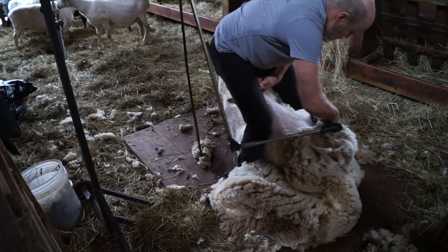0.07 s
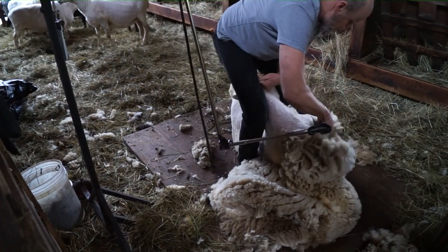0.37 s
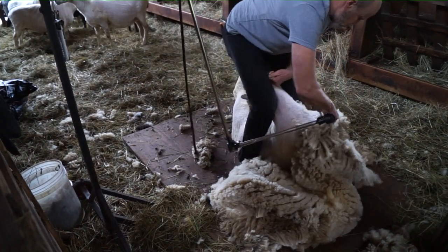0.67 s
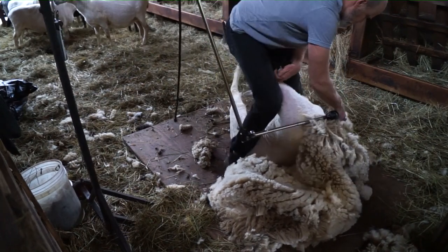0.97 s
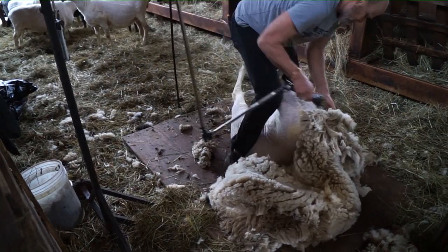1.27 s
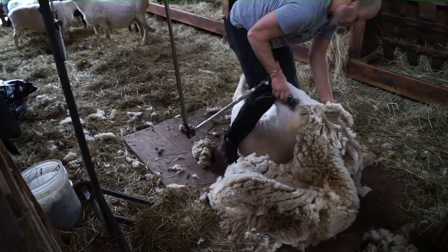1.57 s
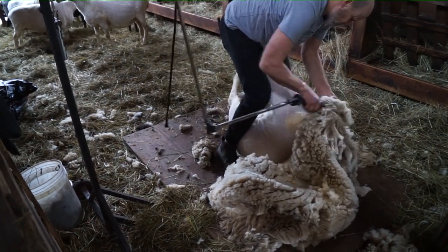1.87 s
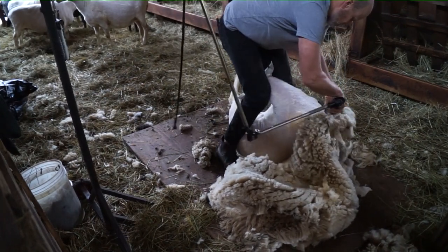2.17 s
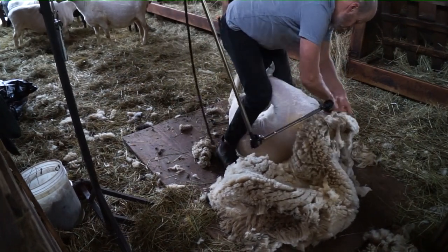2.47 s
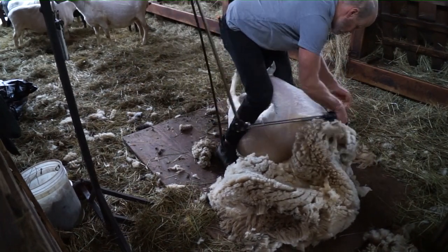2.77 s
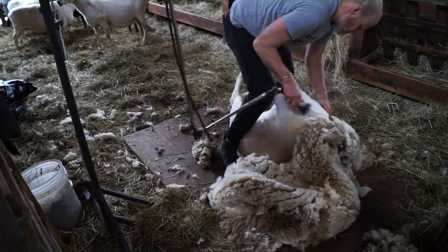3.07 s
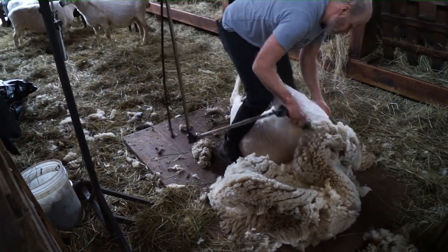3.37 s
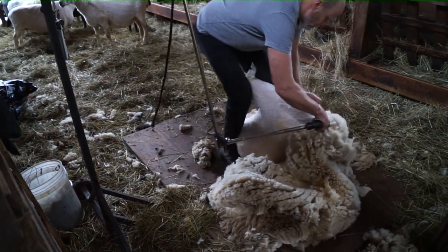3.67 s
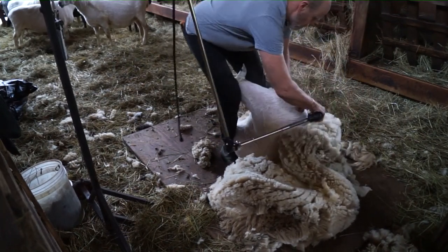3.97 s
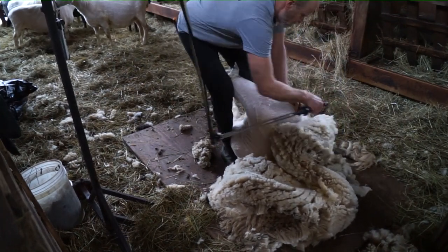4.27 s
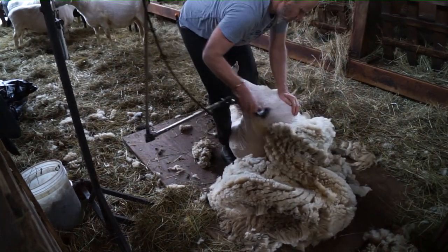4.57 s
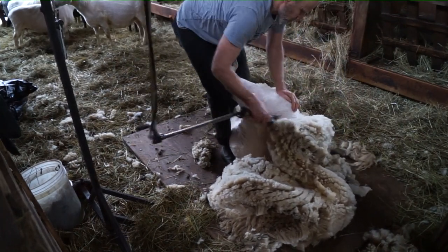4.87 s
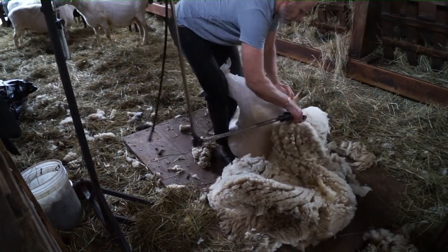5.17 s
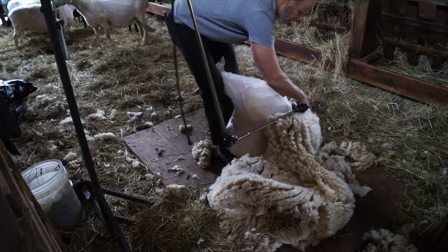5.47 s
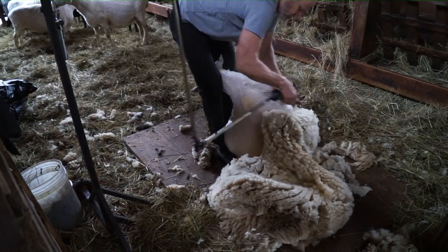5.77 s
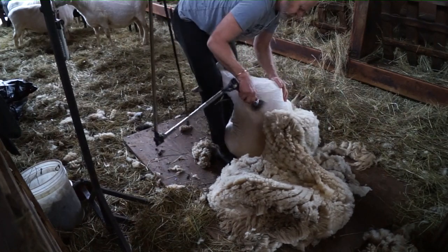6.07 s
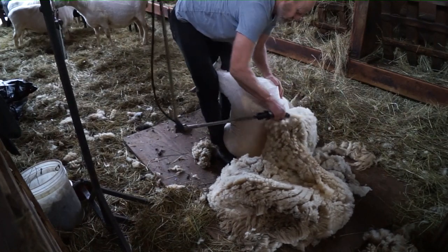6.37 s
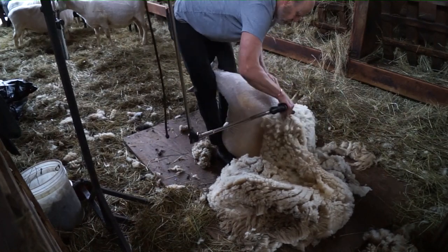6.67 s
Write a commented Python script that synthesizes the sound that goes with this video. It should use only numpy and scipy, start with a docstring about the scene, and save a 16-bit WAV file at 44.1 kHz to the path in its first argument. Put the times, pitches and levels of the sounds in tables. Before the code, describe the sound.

A powered shearing handpiece buzzes and rattles steadily through a sheep's fleece, with hissing wool and thin, high metallic ringing.

```python
"""A sheep is shorn in a barn with a handpiece driven by a shaft from an overhead motor.
From the start the motor whines, the cutter rattles to and fro once a turn, and its bare steel pings.
With each push through the fleece, wool hisses between the teeth. Near 0.8 s something bumps dully
on the shearing board. Cutting and ringing take turns until, from 4.3 s, deep wool damps the steel.
A second bump comes at 4.8 s, the steel rings out again, and a last long push ends the scene."""
import sys
import numpy as np
from scipy import signal
from scipy.fft import rfft, irfft
from scipy.io import wavfile
from scipy.ndimage import uniform_filter1d

SR = 44100
rng = np.random.default_rng(int(sys.argv[2]) if len(sys.argv) > 2 else 0)


def transcribe(u):
    """Save the signal u as a 16-bit wav file named by the first command-line argument.

    u: samples, shape (n,) or (channels, n), limited to [-1, 1]; the rate is SR.
    q: integer samples, one column per channel.
    """
    v = np.clip(np.atleast_2d(u).T, -1, 1)
    q = np.round(v * 32767).astype(np.int16)
    wavfile.write(sys.argv[1], SR, q)


N = 300321
TIME = np.arange(N) / SR

# Levels are relative. A "colour" lists how strong the low and high pitches of a sound are.
# turns of the drive shaft each second: t/s, f/Hz
SHAFT_SPEED = [(0, 58.55), (.6, 58.7), (1.05, 58.5), (1.4, 58.7), (2.0, 58.45), (2.3, 58.75), (2.7, 58.4),
               (3.2, 58.55), (3.9, 58.7), (4.3, 58.45), (5.0, 58.6), (5.35, 58.7), (6.2, 58.45),
               (6.81, 58.7)]
# pushes through the fleece: start/s, end/s, rattle rise/dB, hiss rise/dB, dullness change/dB
PUSHES = [(.19, .48, -1, 2, 0), (.64, .71, -2, 1.5, -3), (.96, 1.3, 1.5, 2, 0), (1.3, 1.73, 1, 2.5, -8),
          (1.75, 2.15, 2, -2, -2), (2.57, 2.66, -2.5, 2, 1), (2.77, 3.06, 2, 1.5, -2),
          (3.2, 3.4, 0, 0.6, -3), (3.6, 3.75, 0, 2, 3), (4.05, 4.27, 0.5, 3, 6), (4.26, 4.99, 1.5, 2.5, -9),
          (5.02, 5.35, 1, 1, -6), (5.63, 5.84, 2, 3, 2), (5.86, 6.02, 1.5, 4, -5),
          (6.12, 6.85, 2.5, 3, 2.5)]
# colour of the rattle: f/Hz, level/dB
RATTLE_COLOUR = [(100, -41), (450, -25.5), (640, -5.5), (1000, -9.5), (1550, -1), (1950, -4.5), (2600, -3),
                 (2900, -3.5), (3450, -0.5), (4000, -3.5), (4700, -5.5), (5200, 0), (5750, -9),
                 (8000, -7.5), (16000, -27.5)]
# ticks as the cutter and the fork that drives it take up their play: place/turns, level/dB
TURN_TICKS = [(.02, 0), (.09, -2), (.35, -2), (.43, 0), (.49, 2), (.55, -3), (.96, -1)]
# colour of those ticks: f/Hz, level/dB
TICK_COLOUR = [(600, -29.5), (2000, -3), (2900, 1.5), (5300, -2.5), (9500, -9.5), (15000, -12)]
# colour of wool being cut: f/Hz, level/dB
WOOL_COLOUR = [(60, -41), (400, -49), (900, -10), (2500, -5), (5200, -.5), (6800, -0.5), (7600, -3.5),
               (9500, -1.5), (10700, -5), (12400, -7.5), (13500, -9), (14500, -10), (15700, -29)]
# spells when the steel rings more (little wool) or less (deep wool): start/s, end/s, rise/dB
RING_SPELLS = [(-.1, .9, 13.5), (1.0, 1.15, 11), (1.77, 1.96, 11), (2.13, 2.55, 10.5), (2.64, 2.73, 14),
               (2.82, 2.96, 12), (3.11, 3.18, 11), (3.37, 3.54, 10), (3.62, 3.72, 12), (3.73, 4.04, 14),
               (4.05, 4.22, 9), (4.3, 5.1, -9), (5.18, 5.33, 7), (5.34, 5.6, 13), (5.95, 6.2, 2)]
# hardest knocks of cutter on comb: t/s, level/dB, time to fade by 60 dB/s
HARD_KNOCKS = [(.0622, -9.5, 0.23), (.1419, -9, .06), (.5291, -10, .06), (.5719, -11, .06),
               (.6439, -9, .07), (0.727, -12, .05), (.8169, -11, .06), (0.881, -6.5, .08), (2.158, -8, .06),
               (2.2128, -8, .06), (2.317, -4, .15), (2.369, -9, .06), (2.401, -9, .06), (2.453, -9, .07),
               (2.502, -6, 0.14), (3.7039, -12, .06), (3.803, -6.5, 0.17), (4.0095, -7, .08),
               (5.4499, -14, .06), (5.494, -12, .06)]
# colour of the click that starts a ping: f/Hz, level/dB
CLICK_COLOUR = [(300, -40), (2500, -8), (12000, 0)]
# pitches at which the comb always rings: f/Hz
COMB_PITCHES = (2578, 3054, 3590, 5220)
# brief rings of comb and casing as the grip shifts: middle/s, f/Hz, level/dB, length/s
GRIP_RINGS = [(.465, 1590, -25, 0.19), (0.528, 2630, -31, 0.21), (0.675, 5260, -23.5, 0.21),
              (1.077, 2480, -22, 0.14), (1.33, 3590, -30, 1), (1.424, 770, -36.5, 0.35),
              (1.5, 5300, -29, .35), (1.7, 2620, -25, 0.7), (1.728, 4077, -20, 0.14),
              (1.998, 3330, -25, 0.38), (2.33, 2530, -28, 0.26), (2.62, 3580, -29, .16),
              (2.83, 3120, -28, 0.12), (2.955, 5350, -25, 0.23), (2.985, 3560, -22.5, 0.17),
              (3.008, 2610, -28, 0.13), (3.058, 1410, -29, 0.17), (3.352, 2200, -25, 0.19),
              (3.65, 5230, -24, 0.26), (4.08, 5200, -22, 0.15), (4.215, 1394, -28, 0.09),
              (4.45, 5340, -22.5, 0.37), (4.52, 3550, -27, .3), (4.65, 2610, -28, 0.59),
              (4.955, 4460, -29, 0.18), (5.07, 2680, -22.5, 0.5), (5.175, 2930, -22, 0.26),
              (5.726, 5260, -24, 0.23), (5.95, 5300, -25, .15), (6.527, 3030, -26, .26),
              (6.563, 1580, -32, 0.46)]
# buzz of the casing as the hand turns it: t/s, level/dB
CASING_LEVEL = [(0, -23), (.45, -23.5), (.6, -24), (1.05, -23), (1.25, -29), (1.8, -23.5), (2.45, -26),
                (2.8, -23.5), (3.2, -30), (3.55, -23.5), (4.23, -25), (4.37, -27), (4.9, -29),
                (5.19, -21.5), (5.36, -25), (6.15, -29), (6.53, -21), (6.81, -25.5)]
# tones in that buzz: multiple of the shaft speed, level/dB
BUZZ_TONES = [(1, -37), (2, -27), (3, -17), (4, -8), (6, -14), (8, -12.5), (10, -5), (11, -8.5), (12, -2),
              (13, -5), (14, -5), (15, 2.5), (17, 1), (18, 1), (20, -3), (21, 7), (22, -1), (24, 3.5),
              (25, 8), (27, -4), (28, 7.5), (29, -9), (30, 4.5), (36, 8.5), (38, 8), (40, 8), (44, 7.5),
              (49, 12.5), (52, 5)]
# single tones swelling and fading: middle/s, multiple of the shaft speed, rise/dB, length/s
BUZZ_SWELLS = [(1.55, 1, 15, 0.83), (3.4, 1, 18, .8), (5.5, 1, 14, 0.74), (6.15, 1, 22, 0.99),
               (1.05, 10, 9, 0.45), (2.0, 10, 10.5, 0.35), (6.55, 10, 8, 0.4), (0.45, 11, -2, 0.56),
               (1.29, 11, 19.5, 0.5), (2.1, 11, 14, 0.72), (3.72, 11, 6, 0.24), (4.12, 11, 16, 0.47),
               (4.7, 11, 16.5, 0.69), (6, 11, 10, .35), (6.6, 11, 9, 0.68), (2.13, 12, 10, 0.43),
               (3.4, 12, 13, 0.37), (4.9, 12, 12, 0.44), (1.64, 15, 9, 0.4), (2.37, 15, 6, 0.22),
               (3.59, 15, 11.5, .35), (5.4, 15, 1, .25), (6.3, 15, 13, 0.18)]
# spells when the cutter runs with no load: start/s, end/s, drop/dB
SLACK_SPELLS = [(.48, .93, 2.5), (2.19, 2.54, 2), (3.78, 4.03, 1.5), (5.42, 5.62, 0.5)]
# the band of pitches that sounds under load: f/Hz, level/dB
LOAD_BAND = [(2700, -40), (3450, -3), (4700, -3), (5200, -32)]
# brief dips in the handpiece's level: middle/s, depth/dB, length/s
LEVEL_DIPS = [(0.56, 2, 0.27), (0.735, 2.5, 0.1), (0.879, 2, 0.14), (2.225, 4.5, 0.064), (2.525, 7, 0.076),
              (2.744, 3, 0.058), (3.827, 3.5, 0.058), (4.022, 2, 0.044)]
# the jointed drive tube drones as it swings: middle/s, level/dB, length/s
TUBE_SWINGS = [(.25, -52, .5), (2.31, -55, 0.3), (3.665, -53, 0.19), (4.24, -52, 0.16), (4.68, -45.5, 0.58),
               (5.7, -49, 0.2), (5.93, -51, 0.35), (6.563, -49, 0.45)]
# motor tones, spaced by multiples of twice the mains frequency: f/Hz, level/dB
MOTOR_TONES = [(1119, -39.5), (1238.7, -41.5), (1479, -40)]
# bumps on the board: t/s, level/dB, time to fade by 60 dB/s, straw scuff against thud/dB
BOARD_BUMPS = [(.765, -32.5, 0.38, 1), (.797, -37, 0.31, 3), (0.917, -42, 0.2, -10),
               (4.807, -25, 0.16, -30), (4.831, -34, .09, -31)]
# colour of a thud: f/Hz, level/dB
THUD_COLOUR = [(40, -40), (85, -17), (125, -5), (180, -4.5), (250, 3), (390, -3.5), (550, -37), (1200, -43)]
# colour of a scuff of straw: f/Hz, level/dB
STRAW_COLOUR = [(150, -36), (450, 8), (900, 0), (2500, -35)]
# the board rumbles as the weight on it shifts: t/s, level/dB, time to fade by 60 dB/s
WEIGHT_SHIFT = (.79, -43.5, 1.0)
# colour of that rumble: f/Hz, level/dB
RUMBLE_COLOUR = [(35, -20), (100, 0), (260, -22)]
# colour of the barn's background: f/Hz, level/dB
BARN_COLOUR = [(20, -60), (68, -47), (105, -19), (165, -3.5), (240, 5), (340, 0), (500, 3.5), (800, 10),
               (1500, -1.5), (4000, -38)]
# sound arriving from the sides: f/Hz, side minus middle/dB
SIDE_COLOUR = [(100, -43), (350, -18), (700, -10.5), (1400, -9), (2800, -5), (5500, -3), (10000, -2.5),
               (15000, 2.5)]
# balance of the two microphones: f/Hz, left minus right/dB
BALANCE = [(100, 1.5), (1400, 4), (2300, 3), (3000, 1), (4200, 3.5), (5300, 3), (7000, 1), (9500, 0.5),
           (15000, -0.5)]
# the handpiece's place between them: t/s, left minus right/dB
TOOL_PLACE = [(0, -3), (3.75, -3.5), (4.75, -2.1), (5.25, -3), (6.81, -2.5)]

BITE_S, LEAVE_S = 0.014, 0.054  # time the comb takes to enter and to leave the wool


def handpiece(turns, ticks, rattle_db, hiss_db, dull_db, room_db=-5):
    """The tool in the hand: rattling steel, hissing wool and a buzzing casing, with the barn's echo."""
    casing_db = curves(CASING_LEVEL)[0]
    knocks = casing_turn(rattle(turns))
    # the casing gives off the low part of the knocks, the fork the middle, the comb the top
    clatter = coloured(knocks, [(1850, 1.0), (2400, -12.5)])
    fork = coloured(knocks - clatter, [(3000, -1.5), (3800, -30)])
    comb = knocks - clatter - fork
    steel = evened(fork * gain_of(dull_db / 2) + comb * gain_of(-dull_db / 2))
    hiss = wool_hiss(turns)
    steel = evened(steel + gain_of(-0.5) * ticking(ticks))
    tool = slackened(steel * gain_of(rattle_db) + hiss * gain_of(hiss_db))
    tool = tool + evened(clatter) * gain_of(casing_db - 3)
    echo = gain_of(room_db) * moving_echo(tool, fade_s=0.32, laps_per_s=2.6)
    tool = evened(tool + echo) * np.std(tool)
    buzz = casing_buzz(turns) * gain_of(casing_db - 3.5)
    dip_db = sum(depth * swell(s, length) for s, depth, length in LEVEL_DIPS)
    return (tool + buzz) * gain_of(-dip_db)


def rattle(turns, count=26, spread_turns=.2, creep_turns=.016, jitter_s=.000085, uneven_db=2):
    """Loose joints knock in every turn, bunched round the two points where the cutter turns back."""
    knocks, whole = np.zeros(N), np.arange(1, int(turns[-1]))
    when = np.interp(whole, turns, TIME)
    for k in range(count):
        offset = spread_turns * (2 * (k + rng.random()) / count - 1)
        place = k % 2 / 2 + offset + creep_turns * drift(when, 1.8)
        slip, force = rng.standard_normal((len(whole), 2)).T
        # the play in each joint blurs the high tones into a rasp
        at = np.interp(whole + place, turns, TIME) + jitter_s * slip
        strength = gain_of(uneven_db * (force + drift(when, 3)))
        knocks[np.clip(np.round(at * SR).astype(int), 0, N - 1)] += rng.choice([-1, 1]) * strength
    return evened(coloured(moving_echo(knocks, fade_s=0.023, laps_per_s=0.696), RATTLE_COLOUR))


def tick_pattern(turns, creep_turns=.016, jitter_s=.00004, uneven_db=1.4, fading_db=2.5):
    """When and how hard each tick strikes: it returns once a turn and creeps as the drive joints bend."""
    whole, ticks = np.arange(1, int(turns[-1]) - 1), []
    when = np.interp(whole, turns, TIME)
    for place, db in TURN_TICKS:
        slip, force = rng.standard_normal((len(whole), 2)).T
        at = np.interp(whole + place + creep_turns * drift(when, 1.2), turns, TIME) + jitter_s * slip
        strength = gain_of(db + uneven_db * force + fading_db * drift(when, 1.987))
        ticks.append((np.round(at * SR).astype(int), strength))
    return ticks


def ticking(ticks, fade_s=.0035, size=256):
    """Each contact of fork and cutter has its own very short ring, the same at every turn."""
    out = np.zeros(N + size)
    for at, strength in ticks:
        ring = evened(rng.standard_normal(size) * gain_of(-60 * TIME[:size] / fade_s))
        out[at[:, None] + np.arange(size)] += strength[:, None] * ring
    return evened(coloured(out[:N], TICK_COLOUR))


def wool_hiss(turns, depth=0.09, lopsided=0.08, grain_db=1.5, flutter_db=0.7):
    """Fibres snap between the teeth, a little louder on each swing of the cutter."""
    pulse = 1 + depth * (np.cos(4 * np.pi * turns) + np.cos(8 * np.pi * turns))
    pulse += lopsided * np.sin(2 * np.pi * turns)
    noise = rng.standard_normal(N)
    grain = evened(uniform_filter1d(rng.standard_normal(N), size=24))
    snaps = noise * gain_of(grain_db * grain + flutter_db * drift(TIME, 35))
    return evened(coloured(snaps * pulse, WOOL_COLOUR))


def steel_ring(turns, ring_hz=12870, upper_hz=13200, knocks_per_s=800, damped_db=-35):
    """Steel hits steel: many small knocks and a few hard ones make the cutter ring; wool damps it."""
    chance = knocks_per_s / SR * (1 + 0.37 * np.cos(4 * np.pi * turns))
    knocks = (rng.random(N) < chance) * rng.choice([-1, 1], N)
    knocks = knocks * gain_of(4 * np.clip(rng.standard_normal(N), -2, 2))
    sizzle = resonate(coloured(knocks, [(12300, -30), (12900, 10)]), upper_hz, width_hz=850)
    ring = evened(resonate(knocks, ring_hz, width_hz=90)) + gain_of(-3) * evened(sizzle)
    bare_db = held(RING_SPELLS, rise_s=0.04, fall_s=0.07)[0]
    ring = evened(ring) * gain_of(damped_db + bare_db + 1.5 * drift(TIME, 24))
    t = TIME[:6000]
    for s, db, fade_s in HARD_KNOCKS:
        ping = np.exp(2j * np.pi * (ring_hz + rng.uniform(0, 53)) * t) * gain_of(-60 * t / fade_s)
        click = gain_of(-13 - 60 * t / .005) * evened(coloured(rng.standard_normal(len(t)), CLICK_COLOUR))
        add(ring, s, gain_of(db - 4) * (ping + click))
    # so short a wave reaches the two microphones out of step
    return np.array([gain_of(2.0) * (ring * np.exp(1j * 1.17)).real, gain_of(4.5) * ring.real])


def comb_ring(ticks, rattle_db, scrape_db=-1, steady_db=-17):
    """Ticks and scraping keep the comb ringing; single pitches swell and die as the grip shifts."""
    drive = ticking(ticks) + gain_of(scrape_db) * rng.standard_normal(N)
    out = sum(evened(signal.lfilter(*signal.iirpeak(hz, Q=100, fs=SR), drive)) for hz in COMB_PITCHES)
    out *= gain_of(rattle_db + steady_db - held(SLACK_SPELLS, BITE_S, LEAVE_S)[0])
    for s, hz, db, length in GRIP_RINGS:
        near = abs(TIME - s) < length / 2
        ring = signal.lfilter(*signal.iirpeak(hz, Q=25, fs=SR), drive[near])
        out[near] += gain_of(db) * evened(ring) * np.hanning(len(ring))
    return out


def casing_buzz(turns, sway_rad=0.058, fading_db=1.6, step=6):
    """Clean tones at multiples of the shaft speed; each swells and fades in its own time."""
    t, out = TIME[::step], 0
    for k, db in BUZZ_TONES:
        phase = sway_rad * k * drift(t, 5) + 2 * np.pi * rng.random()
        rise_db = sum(rise * swell(s, length)[::step]
                      for s, multiple, rise, length in BUZZ_SWELLS if multiple == k)
        strength = gain_of(db + rise_db + fading_db * drift(t, 10))
        out = out + strength * np.cos(2 * np.pi * k * turns[::step] + phase)
    return evened(signal.resample_poly(out, step, 1)[:N])


def cutter_load(idle_rattle_db=-20, idle_hiss_db=-18, idle_dull_db=4):
    """Rattle, hiss and dullness in dB: each push loads the cutter, and the wool is lumpy."""
    rattle_db, hiss_db, dull_db = held(PUSHES, BITE_S, LEAVE_S)
    lumps_db = 0.51 * drift(TIME, 11)
    return idle_rattle_db + rattle_db + lumps_db, idle_hiss_db + hiss_db + lumps_db, idle_dull_db + dull_db


def slackened(x):
    """With the load off the cutter, its upper middle pitches get weaker."""
    drop_db = held(SLACK_SPELLS, rise_s=0.032, fall_s=0.045)[0]
    return x - coloured(x, LOAD_BAND) * (1 - gain_of(-drop_db))


def casing_turn(x, depth_db=0.5):
    """The casing sends each band of pitches its own way, so bands swell and fade as it turns."""
    bands = signal.stft(x, nperseg=1024)[2]
    patches = rng.standard_normal(bands.shape)
    for _ in range(2):
        patches = uniform_filter1d(uniform_filter1d(patches, size=6, axis=0), size=12, axis=1)
    return evened(signal.istft(bands * gain_of(depth_db * evened(patches)), nperseg=1024)[1][:N])


def board_bumps(rise_s=0.0035, board_hz=250):
    """Soft, heavy knocks on the board, with a scuff of straw and a low rumble as the weight settles."""
    out, t = np.zeros(N), TIME[:SR // 2]
    onset = 1 - np.exp(-t / rise_s)
    for s, db, fade_s, scuff_db in BOARD_BUMPS:
        thud, scuff = noise_of(THUD_COLOUR, len(t)), noise_of(STRAW_COLOUR, len(t))
        thud = evened(thud + np.sqrt(2) * np.sin(2 * np.pi * board_hz * t))  # the board's own note
        add(out, s, (thud + gain_of(scuff_db) * scuff) * gain_of(db - 60 * t / fade_s) * onset)
    s, db, fade_s = WEIGHT_SHIFT
    add(out, s, noise_of(RUMBLE_COLOUR, len(t)) * gain_of(db - 60 * t / fade_s) * onset)
    return out


def motor_whine(waver_rad=0.089, fading_db=2):
    """Magnetic forces make the overhead motor whine steadily."""
    out = 0
    for hz, db in MOTOR_TONES:
        strength = np.sqrt(2) * gain_of(db + fading_db * drift(TIME, 6.3))
        out = out + strength * np.sin(2 * np.pi * hz * TIME + waver_rad * drift(TIME, 4.4))
    return out


def tube_drone(turns, rest_db=-54.5):
    """The drive tube hums at five times the shaft speed, louder when it swings."""
    swings = sum(gain_of(db) * swell(s, length) for s, db, length in TUBE_SWINGS)
    return np.sqrt(2) * np.sin(2 * np.pi * 5 * turns) * (gain_of(rest_db) + swings)


def barn(level_db=-42, swell_db=1.5):
    """The barn's soft background noise gently rises and falls."""
    return noise_of(BARN_COLOUR, N) * gain_of(level_db + swell_db * drift(TIME, 4.6))


def moving_echo(x, fade_s, laps_per_s):
    """Two echoes blend back and forth as the handpiece travels over the sheep."""
    angle = 2 * np.pi * (laps_per_s * TIME + .15 * drift(TIME, 1))
    return echoed(x, fade_s) * np.cos(angle) + echoed(x, fade_s) * np.sin(angle)


def echoed(x, fade_s, size=12000):
    """Many close reflections that die away, equally strong at low and high pitches."""
    spectrum = rfft(rng.standard_normal(size) * gain_of(-60 * TIME[:size] / fade_s))
    spectrum /= np.sqrt(uniform_filter1d(abs(spectrum) ** 2, size=16))
    return signal.oaconvolve(x.astype(np.float32), irfft(spectrum).astype(np.float32))[:N]


def gain_of(db):
    """Turns decibels into a factor to multiply by."""
    return 10 ** (np.asarray(db) / 20)


def evened(x):
    """Scales a sound to an average power of one."""
    return x / np.sqrt(np.mean(abs(x) ** 2) + 1e-20)


def curves(rows):
    """Joins each column of a table by straight lines in time."""
    s, *columns = np.transpose(rows)
    return [np.interp(TIME, s, c) for c in columns]


def held(rows, rise_s, fall_s):
    """Each row rises at its start, holds and falls at its end; one curve per value column."""
    return sum(np.outer(values, np.clip((TIME - start) / rise_s, 0, 1)
                        - np.clip((TIME - end) / fall_s, 0, 1)) for start, end, *values in rows)


def swell(middle, length):
    """A smooth rise to one and back."""
    return np.cos(np.pi * np.clip((TIME - middle) / length, -.5, .5)) ** 2


def drift(t, rate, count=12):
    """A random wobble of about size one, moving up to rate times a second."""
    speed, start = rng.random((2, count, 1))
    coarse = np.linspace(0, N / SR, 700)
    waves = np.sin(2 * np.pi * (rate * speed * coarse + start))
    return np.interp(t, coarse, waves.sum(0) * np.sqrt(2 / count))


def coloured(x, colour, size=4096):
    """Filters a sound by a list of f/Hz, level/dB points."""
    hz, db = np.transpose(colour)
    curve_db = np.interp(np.log(np.fft.rfftfreq(size, 1 / SR) + 1), np.log(hz + 1), db)
    taps = np.fft.fftshift(irfft(gain_of(curve_db))) * np.hanning(size)
    return signal.oaconvolve(x.astype(np.float32), taps[1:].astype(np.float32), "same")


def noise_of(colour, size):
    """Noise with the given colour."""
    return evened(coloured(rng.standard_normal(size), colour))


def resonate(x, hz, width_hz):
    """Rings at one pitch, as a complex wave; a narrower width rings longer."""
    return signal.lfilter([1], [1, -np.exp((2j * np.pi * hz - np.pi * width_hz) / SR)], x + 1e-18)


def add(mix, s, sound):
    """Adds a sound at time s."""
    part = mix[max(round(s * SR), 0):][:len(sound)]
    part += sound[:len(part)]


def scene():
    """The shearing heard from the front and, scattered by the barn, from the sides."""
    turns = np.cumsum(curves(SHAFT_SPEED)[0] + .1 * drift(TIME, 6)) / SR
    rattle_db, hiss_db, dull_db = cutter_load()
    ticks = tick_pattern(turns)
    mid = handpiece(turns, ticks, rattle_db, hiss_db, dull_db) + comb_ring(ticks, rattle_db)
    mid = mid + motor_whine() + tube_drone(turns) + board_bumps() + barn()
    side = handpiece(turns, ticks, rattle_db, hiss_db, dull_db) + board_bumps() + barn()
    side = coloured(side, SIDE_COLOUR)
    place = gain_of(curves(TOOL_PLACE)[0] / 2)
    left = coloured(mid + side, [(hz, db / 2) for hz, db in BALANCE]) * place
    right = coloured(mid - side, [(hz, -db / 2) for hz, db in BALANCE]) / place
    return gain_of(-1.5) * np.array([left, right]) + steel_ring(turns)


def record(dry):
    """Clips peaks at full scale, then cuts the treble above 15850 Hz."""
    low_pass = signal.firwin(511, 15850, window=("kaiser", 9), fs=SR)
    return signal.oaconvolve(np.clip(dry, -1, 1), low_pass[None], "same", axes=1)


dry = scene()
out = record(dry)
transcribe(out)
```